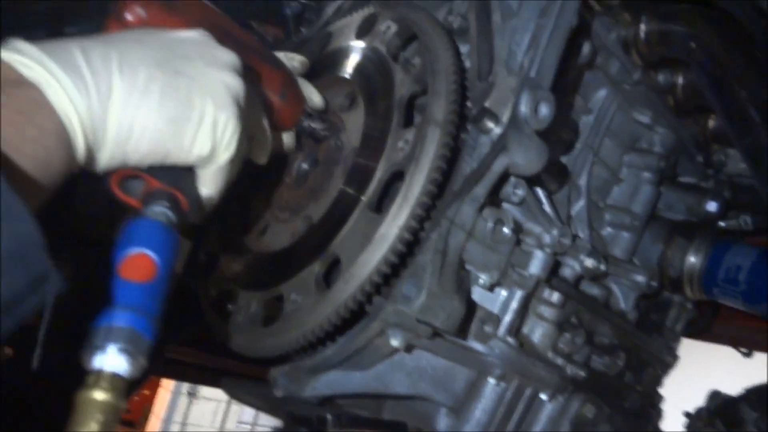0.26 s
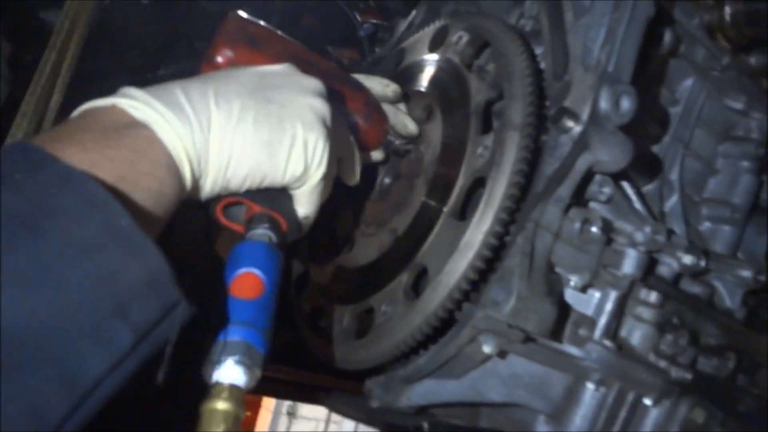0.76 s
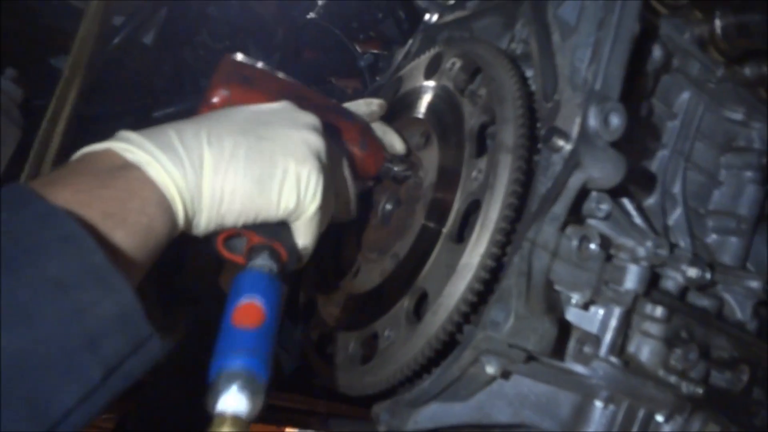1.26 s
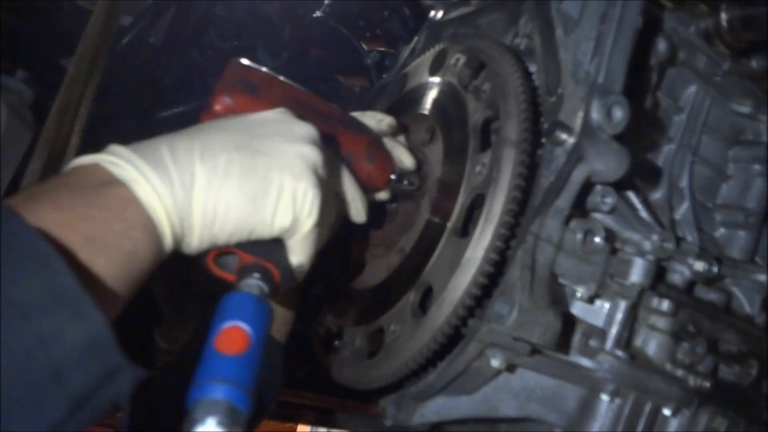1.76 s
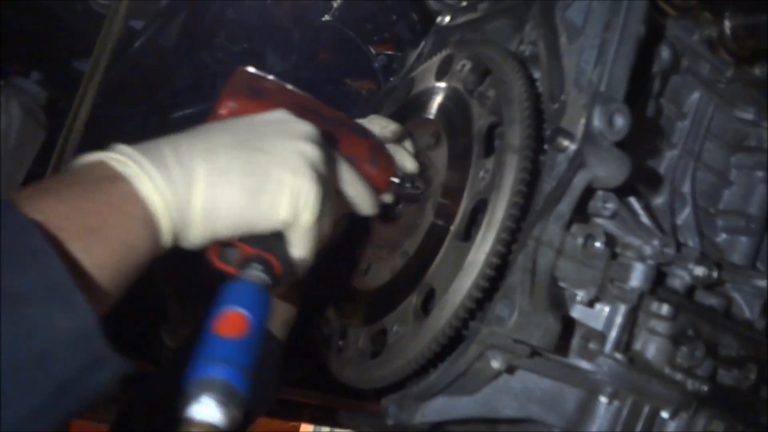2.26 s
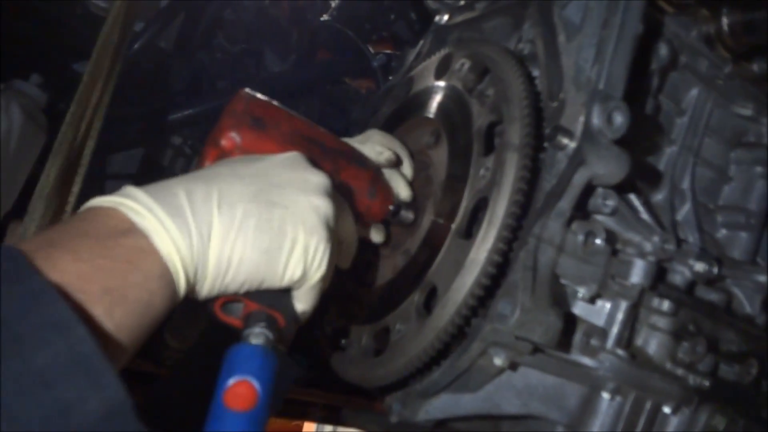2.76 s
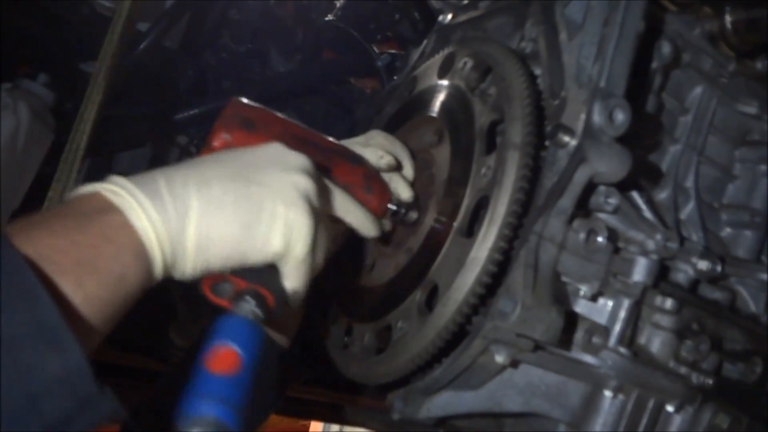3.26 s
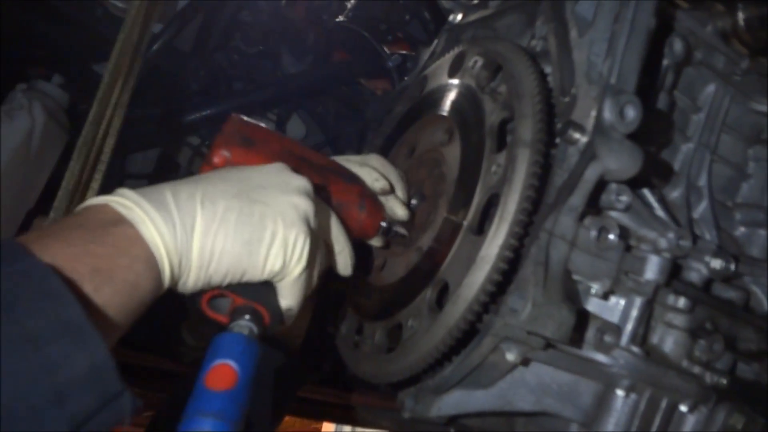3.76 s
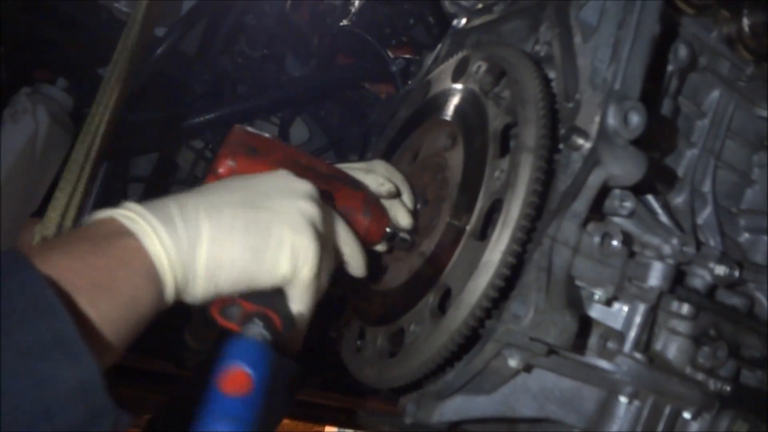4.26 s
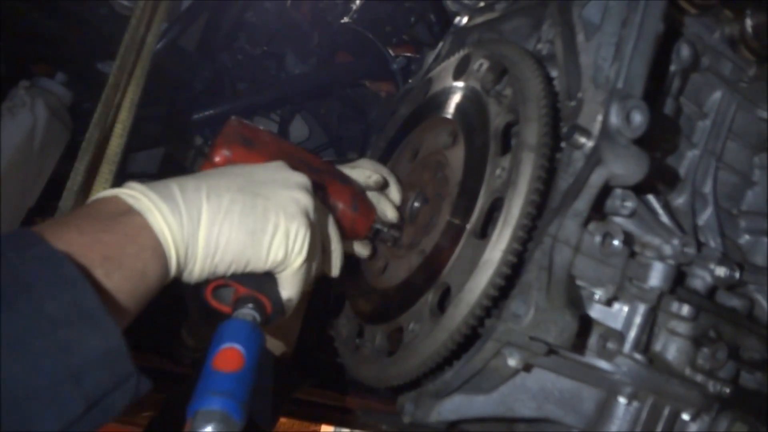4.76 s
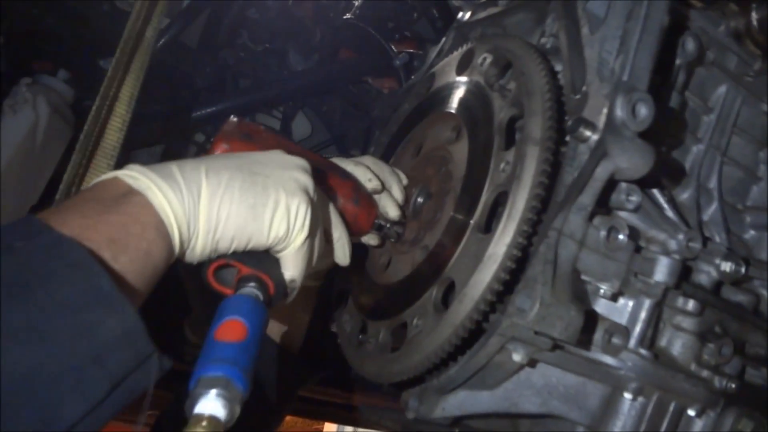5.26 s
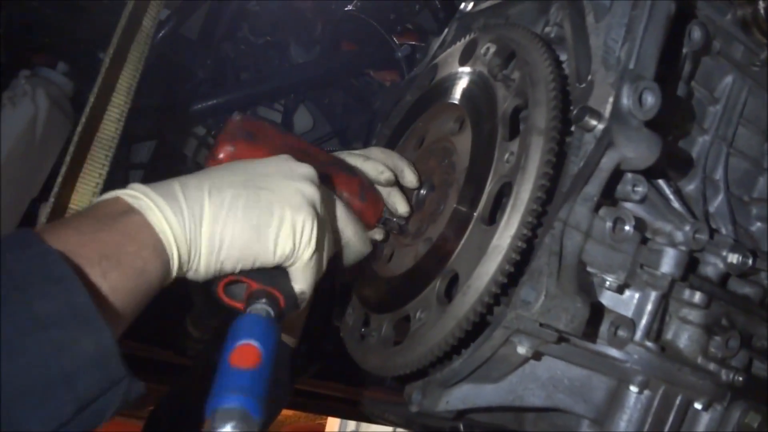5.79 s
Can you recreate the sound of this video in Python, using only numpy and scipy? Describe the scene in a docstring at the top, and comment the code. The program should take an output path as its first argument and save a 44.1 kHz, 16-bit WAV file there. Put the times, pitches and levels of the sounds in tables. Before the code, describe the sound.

A light metal clink opens over a faint garage hum. Near 0.8 seconds a socket clicks onto a bolt, followed by a faint, thin hiss of leaking air. At 1.1 seconds a close air impact wrench fires its loudest burst, a bright, fluttering blast of exhaust over a chugging motor, lasting about a fifth of a second. Similar short bursts come at 2.0, 3.0, 4.0 and 5.6 seconds. Each ends with a small knock as the tool coasts and leaves the steel flywheel ringing briefly, most clearly at about 4.2 seconds. In the pauses the socket clicks and clinks off one bolt and onto the next, around 1.7, 2.5, 2.8, 3.5, 3.8 and 5.4 seconds, often stirring a soft ring. The last burst ends with a sharp metallic knock near 5.8 seconds. The room adds a short echo, and the background slowly sinks.

```python
"""Five short, hissing bursts of an air impact tool on the bolts of a steel flywheel in a garage.
Each hammer cycle is a blast of exhaust air over the chug of a vane motor; the last blow of a burst
leaves the flywheel ringing. Between bursts the socket clicks off one bolt and onto the next.
Underneath sit a short room echo, one brief air leak and a faint, humming shop background."""
import sys
import numpy as np
from scipy import signal
from scipy.fft import rfft, irfft, next_fast_len
from scipy.io import wavfile
from scipy.ndimage import uniform_filter1d

SR = 44100
rng = np.random.default_rng(int(sys.argv[2]) if len(sys.argv) > 2 else 0)


def waveform_to_disk(signal):
    """Save audio, clipped to [-1, 1], as 16-bit WAV at the path in sys.argv[1]."""
    frames = np.transpose(np.atleast_2d(signal))
    scaled = np.clip(frames, -1, 1) * 32767
    samples = np.round(scaled).astype(np.int16)
    wavfile.write(sys.argv[1], SR, samples)


N = 265954
TIME = np.arange(N) / SR

# Hammer cycles, one list per burst. Each row: air on in seconds, hiss level in dB.
HAMMER_CYCLES = [
    [(1.118, -12), (1.131, 7), (1.172, 11), (1.21, 7.5), (1.254, 2.5)],
    [(2.008, -21.5), (2.017, -13), (2.029, -8.5), (2.058, -9), (2.098, -2.4), (2.139, 0.5)],
    [(3.02, -16), (3.035, -3.5), (3.075, -8.5), (3.116, -6.5), (3.158, -7)],
    [(4.032, -11), (4.051, -7.5), (4.087, -4.5), (4.112, -9), (4.157, -12)],
    [(5.62, -12.5), (5.631, -7.5), (5.66, -9), (5.7, -10.5), (5.736, -10.5), (5.776, -12)],
]
# Exhaust colour, one list per bolt as the tool is turned. Each row: frequency in Hz, relative dB.
EXHAUST_COLOURS = [
    [(880, -41), (1500, -6.5), (1780, -31), (2270, -19.5), (2490, -8), (2690, -11), (3590, -7.5),
     (4550, 2.5), (6430, -5.5), (7030, -2.5), (8000, -6.5), (9370, 0), (13500, 1), (15200, 2.5),
     (16000, -13)],
    [(880, -50.5), (1500, -5.5), (1830, -22), (2100, -14.5), (2340, -24.5), (2540, -14), (2800, -14),
     (3730, -12), (5170, -2), (6500, -9.5), (7610, -6), (10000, -12), (11700, 3), (14600, -9),
     (16000, -9.5)],
    [(880, -76), (1500, -5.5), (1740, -18.5), (2880, -16.5), (3220, -7.5), (4080, -12.5), (5020, -1),
     (6310, -10), (7460, -5.5), (8660, -7.5), (9280, -0.5), (10100, 1.5), (11200, -5), (14600, -1),
     (16000, -7.5)],
    [(880, -33), (1500, -16.5), (2000, -11), (2250, -21), (2560, -12.5), (3770, -13.5), (5540, -1),
     (6310, -16), (7100, -5.5), (8000, -13), (9010, -3), (11800, 1), (12600, -5.5), (15100, -6.5),
     (16000, -25.5)],
    [(880, -33), (1500, -12.5), (1810, -27), (1980, -12), (2210, -32), (2590, -17), (3730, -12),
     (5120, -3.5), (6000, -12), (7390, -4), (9010, -15), (11100, 2), (12200, -10.5), (13700, -4.5),
     (16000, -21)],
]
# The throaty body of the motor. Each row: frequency in Hz, relative dB.
CHUG_COLOUR = [(15, -75), (25, -46), (80, -43), (189, -32.5), (325, -14.5), (418, -4), (498, -2),
               (605, -12), (680, -2.5), (893, -2.5), (984, -1), (1320, -8), (1760, -12.5), (1980, -10.5),
               (2270, -14.5), (2600, -13), (3380, -40), (5720, -120)]
# Motor against hiss. Each entry: one burst's balance in dB.
MOTOR_DB = [-9.5, -11, -9.5, -10, -10.5]
# Stereo spread of tool, taps and leak. Each row: frequency in Hz, side against mid in dB.
TOOL_WIDTH = [(60, -19.5), (130, -15), (290, -8.5), (640, -6.5), (1410, -3), (3100, -7), (6820, -11),
              (15000, -21)]
VANES_PER_S, TURNS_PER_S = 350, 100
STALL_S, SPIN_UP_STALL_S = 0.0088, 0.0046   # the air dips before each next cycle; less after the first
SPIN_UP_CHUG_DB = -6   # the motor is weaker in the first cycle

# The last blow of each burst. Each row: trigger release in seconds, ring level in dB,
# brightness in dB per octave, place round the wheel in degrees.
LAST_BLOWS = [(1.284, -8, 1.46, 47), (2.165, -19.5, 3.5, 148), (3.185, -19, 3.4, 75.7),
              (4.187, 2, -5.5, 112.3), (5.794, -18.5, -2.5, 276)]
# Soft touches that stop the wheel and set its low modes going afresh. Each row: start in seconds,
# ring level in dB, brightness in dB per octave, place round the wheel in degrees.
WHEEL_TOUCHES = [(0.0, -27, -9.5, 256), (0.095, -35.5, -5.5, 332), (0.802, -22, -10.5, 354),
                 (1.722, -19, -12, 320), (1.759, -20, -8, 320), (2.525, -19.5, -7, 32.8),
                 (2.789, -29.0, -1.5, 44), (3.543, -23, -7, 112), (3.839, -39.4, -3.5, 35),
                 (4.603, -30.5, -8.2, 45), (5.388, -54, 6, 44)]
# The flywheel's partials. Each entry: one mode's pitch in Hz.
WHEEL_HZ = [1417, 1454, 2283, 3296, 3298.3, 3424, 4376, 4560, 6175, 6827, 7194, 7450, 8573, 8601, 10251,
            10426, 10460, 10611, 11066, 11083, 11900, 12063, 12777, 13464]
# Their patterns. Each entry: one mode's number of loud spots round the wheel.
WHEEL_LOBES = [4, 4, 6, 5, 5, 5, 5, 3, 1, 6, 4, 1, 4, 3, 1, 2, 3, 4, 4, 5, 2, 2, 2, 1]
# Their rings. Each row: relative dB, seconds to fade 60 dB, phase of the pattern in degrees.
WHEEL_MODES = [(-25.5, .82, 276), (-29.5, 1.9, 215), (-40.5, 3.9, 180), (-16.5, 0.66, 63), (-23, 0.6, 45),
               (-20, 0.41, 320), (-30, .77, 100), (-36.5, 0.63, 95), (-14, 0.27, 310), (-39.5, .5, 250),
               (-13, .3, 247), (-13, .34, 304), (-16.5, .36, 160), (-26, .36, 140), (-6, .34, 180),
               (-0.5, .2, 12), (-10.5, .23, 79), (-13, .25, 132), (-6.5, .27, 97), (-6.5, .27, 298),
               (-19.5, 0.32, 130), (-6, .23, 40), (-7.5, 0.23, 356), (-9.5, .17, 284)]
LOBE_DB, TOUCH_TOP_HZ = 12, 4000   # lift or cut at a loud or quiet spot; touches ring below this pitch

# Taps that leave the socket ringing.
# Each row: start in seconds, then click, thud and ring in relative dB.
RINGING_SOCKET_TAPS = [(.8, -26, -11.5, -63), (1.719, -28.5, -25.5, -60), (1.758, -49, -31.5, -75),
                       (2.525, -15.5, -29, -46.5), (3.541, -22, -34.5, -54)]
# Their bright snap, shared by the clinks. Each row: frequency in Hz, relative dB.
SNAP_COLOUR = [(120, -60), (400, -26.5), (1500, -12.5), (2500, 3.5), (5000, -4), (9000, -9.5), (12000, 1.5),
               (16000, 1.5)]
# The socket's ring. Each row: pitch in Hz, relative dB, seconds to fade 60 dB.
SOCKET_MODES = [(3400, -5, .15), (6175, -9, .2), (7300, 0.5, .2), (8380, -2, 0.21), (10426, 3.5, 0.19),
                (11070, -1.5, 0.29), (12900, -0.5, .14)]
# Clinks on a bolt head. Each row: start in seconds, then click, thud and ring in relative dB.
BOLT_CLINKS = [(.093, -17.5, -34, -47), (2.805, -42, -23.5, -48), (3.852, -34, -37, -41),
               (4.601, -40, -34.5, -48.5)]
# The short ring of a clink. Each row: pitch in Hz, relative dB, seconds to fade 60 dB.
CLINK_MODES = [(2420, -10, .12), (3310, -8, 0.11), (4676, -1, 0.2), (5150, -10, 0.099), (7500, -7, .07),
               (8450, -4, .06), (9900, -12, .12), (12000, -8.5, .05), (13600, -9.5, 0.0807)]
# The hammer knocks again as the rotor coasts.
# Each row: start in seconds, then click, thud and ring in relative dB.
COASTING_KNOCKS = [(1.322, -13, -4, -50.5), (2.239, -27.5, -12.5, -52), (3.253, -17, -16, -67),
                   (4.203, -22, -11.5, -27), (5.81, -7, -16.5, -25), (5.829, -15, -22.5, -48)]
# The crack of those knocks. Each row: frequency in Hz, relative dB.
KNOCK_COLOUR = [(150, -64), (500, -27.5), (1500, -11), (3000, -5), (6000, 1), (10000, -3), (16000, -18.5)]
# The socket lands held, with no ring. Each row: start in seconds, then click and thud in relative dB.
SOCKET_LANDINGS = [(.192, -40.5, -38), (.212, -48, -74), (.317, -48, -70), (.358, -52, -70),
                   (.492, -68, -42.5), (.773, -35, -27), (.781, -15.5, -21.5), (.79, -35, -15.5),
                   (1.09, -43.5, -64), (1.911, -57.5, -49), (2.685, -51.5, -66.5), (2.779, -40.5, -54),
                   (2.784, -20, -30), (3.829, -22, -37), (4.612, -59, -41.5), (4.678, -61, -47.5),
                   (4.982, -59, -67.5), (5.208, -56, -58), (5.379, -56, -54), (5.386, -19, -37),
                   (5.405, -54.5, -47), (5.42, -60, -49)]
# The tick of a landing. Each row: frequency in Hz, relative dB.
LANDING_COLOUR = [(120, -60.5), (400, -27.5), (1500, -11.5), (2500, -4), (5000, 1), (7500, -0.5), (9000, 6),
                  (11000, -8), (16000, -5)]

# The echo's decay as heard; its top treble dies almost at once.
# Each row: frequency in Hz, seconds to fade 60 dB.
ECHO_T60 = [(100, 0.14), (500, 0.34), (2000, 0.4), (5000, 0.4), (9000, 0.27), (12000, 0.27), (14000, .15),
            (16000, 0.07)]
# The echo's tone. Each row: frequency in Hz, relative dB.
ECHO_COLOUR = [(300, -4), (1500, 1), (3000, 4.5), (5000, -3.5), (8000, 2.5), (13000, -2.5)]
# The echo's spread. Each row: frequency in Hz, side against mid in dB.
ECHO_WIDTH = [(60, -27.5), (180, -23), (550, -40), (1650, -11), (4970, -12), (15000, -17)]
AIR_ECHO_DB, TAP_ECHO_DB, RING_ECHO_DB = -11.5, -25, -24   # reverb sends

# A brief puff of leaking air. Each row: time in seconds, level in dB.
LEAK_FADE = [(.85, -78), (.9, -60), (.94, -55.5), (.99, -65), (1.05, -80)]
# Its thin, whistling colour. Each row: frequency in Hz, relative dB.
LEAK_COLOUR = [(1760, -42), (3000, -28.5), (3360, -0.5), (3620, -22.5), (4110, -16), (5110, -5),
               (11400, -8), (12500, -1), (16000, -19.5)]
# The shop background slowly sinks. Each row: time in seconds, level in dB.
SHOP_FADE = [(0, -59), (1, -57), (2, -63), (3, -65.5), (4, -67), (5, -69.5), (6.03, -68.5)]
# Its dull colour. Each row: frequency in Hz, relative dB.
SHOP_COLOUR = [(12, -56.5), (20, -26.5), (53, -24.5), (123, -9), (262, -15.5), (607, -6.5), (759, -7),
               (825, -5.5), (949, -6.5), (1330, -11), (1440, -6.5), (1570, -14.5), (2140, -20),
               (13500, -27.5), (16000, -29.5)]
# Its spread. Each row: frequency in Hz, side against mid in dB.
SHOP_WIDTH = [(60, -15), (180, -7.5), (550, -6), (1650, -6.5), (4970, -3), (15000, -12.5)]
# Its hum. Each row: pitch in Hz, peak level in dB against the background noise.
SHOP_HUM = [(118.4, -17), (764.4, -7.5)]


def tool_burst(start, cycles, let_go, motor_db, colour):
    """Exhaust hiss fluttering with vanes and rotor turns, over the pulsing chug of the motor."""
    t = start + np.arange(int(.38 * SR)) / SR
    vanes = pulses(t, VANES_PER_S, jitter=.25, spread_db=3.5)
    turns = pulses(t, TURNS_PER_S, jitter=.17, spread_db=3.5)
    vane_puffs = signal.lfilter([1], [1, -.985], vanes)
    turn_puffs = signal.lfilter([1], [1, -.993], turns)
    flutter = 1 + .5 * vane_puffs + .54 * turn_puffs
    hiss = rms_one(flutter * coloured(rng.standard_normal((2, len(t))), colour, TOOL_WIDTH))
    noise = rng.standard_normal((2, len(t)))
    buzz_mid = vanes - uniform_filter1d(vanes, size=400)
    buzz_side = .5 * np.roll(vanes, 30) * np.sign(noise[1])
    chug = coloured(.14 * noise + [buzz_mid, buzz_side], CHUG_COLOUR, TOOL_WIDTH)
    on, hiss_db = np.transpose(cycles)
    first = on == on[0]
    off = np.append(on[1:], let_go + STALL_S) - np.where(first, SPIN_UP_STALL_S, STALL_S)
    spans = list(zip(on, off))
    chug_db = hiss_db + motor_db + SPIN_UP_CHUG_DB * first
    hiss_gate = air_gate(t, spans, hiss_db, gap_db=-4, lag=0, rise=.0013, fall=.002, coast=.028)
    chug_gate = air_gate(t, spans, chug_db, gap_db=-13, lag=.011, rise=.0042, fall=.01, coast=.11)
    return hiss * hiss_gate + chug * chug_gate


def pulses(t, per_s, jitter, spread_db):
    """The motor's beat: a pulse train, uneven in spacing and strength."""
    timing, strength = rng.standard_normal((150, 2)).T
    at = ((np.arange(len(timing)) + jitter * timing) * SR / per_s).astype(int)
    inside = (at >= 0) & (at < len(t))
    train = np.zeros(len(t))
    train[at[inside]] = from_db(spread_db * strength[inside])
    return train


def air_gate(t, spans, level_db, gap_db, lag, rise, fall, coast):
    """The level dips each time the hammer lands and stalls the rotor, then coasts out at the end."""
    points = [(spans[0][0] - .01, level_db[0] - 33.5)]
    for (on, off), db in zip(spans, level_db):
        points += [(on + lag - rise, db + gap_db), (on + lag, db), (off, db), (off + fall, db + gap_db)]
    run_down = [(off + fall, db - 7.5), (off + fall + coast, db - 50)]
    return fade(t, sorted(points[:-1] + run_down))


def flywheel():
    """The wheel rings until the next blow or touch; the place struck decides which modes stand out."""
    out = np.zeros((2, N))
    blows = [(*row, SR / 2) for row in LAST_BLOWS]
    touches = [(*row, TOUCH_TOP_HZ) for row in WHEEL_TOUCHES]
    strikes = sorted(blows + touches)
    stops = [row[0] for row in strikes[1:]] + [N / SR]
    for (start, db, tilt_db, place, top_hz), stop in zip(strikes, stops):
        for hz, lobes, (mode_db, t60, phase) in zip(WHEEL_HZ, WHEEL_LOBES, WHEEL_MODES):
            bright_db = tilt_db * np.log2(hz / WHEEL_HZ[0])
            place_db = LOBE_DB * np.cos(np.radians(lobes * place - phase))
            level_db = db + mode_db + bright_db + place_db
            if hz < top_hz:
                add(out, start, ringing_mode(hz, level_db, t60, until=stop - start, swell=.017))
    return out


def ringing_mode(hz, level_db, t60, until=3.0, swell=.0049):
    """One dying partial of steel, damped at `until` seconds; the side is weaker and shifted in phase."""
    t = np.arange(int(min(1.2 * t60, until + .0072) * SR)) / SR
    phase, lag = rng.uniform(0, 2 * np.pi, 2)
    decay = from_db(level_db - 60 * t / t60)
    gate = np.clip(np.minimum(t / swell, (until + .0059 - t) / .012), 0, 1)
    return decay * gate * np.sin(2 * np.pi * hz * t + [[phase], [phase + lag]]) * [[1], [.25]]


def metal_taps():
    """Each socket or hammer contact is a noise click and a thud; all but the held landings also ring."""
    out = np.zeros((2, N))
    t = np.arange(SR // 12) / SR
    snap = from_db(-60 * t / .012) + .24 * from_db(-60 * t / .081)
    kinds = [(RINGING_SOCKET_TAPS, SNAP_COLOUR, SOCKET_MODES), (BOLT_CLINKS, SNAP_COLOUR, CLINK_MODES),
             (COASTING_KNOCKS, KNOCK_COLOUR, CLINK_MODES), (SOCKET_LANDINGS, LANDING_COLOUR, [])]
    for hits, colour, modes in kinds:
        for start, click_db, thud_db, *ring_db in hits:
            click = .5 * snap * coloured(rng.standard_normal((2, len(t))), colour, TOOL_WIDTH)
            add(out, start, from_db(click_db) * click + from_db(thud_db) * body_thud(t))
            for hz, mode_db, t60 in modes:
                add(out, start, ringing_mode(hz, ring_db[0] + mode_db + rng.normal(0, 3), t60))
    return out


def body_thud(t):
    """A knock stirs four broad, dull resonances of the tool body."""
    knock = rng.standard_normal((2, len(t))) * from_db(-60 * t / .05) * [[1], [.4]]
    body = (2.1 * resonate(knock, 1280, 270) + .5 * resonate(knock, 620, 250)
            + .29 * resonate(knock, 2000, 1000) + .62 * resonate(knock, 3100, 530))
    thud = signal.sosfilt(signal.butter(2, 400, "high", fs=SR, output="sos"), body)
    return thud / np.abs(thud).max()


def echo(send):
    """A short tail of third-octave noise bands, each dying at its own rate."""
    t = np.arange(SR) / SR
    white = rng.standard_normal((2, 2, len(t)))
    tail = np.zeros((2, len(t)))
    for k, hz in enumerate(60 * 2 ** np.arange(0, 8.2, 1 / 3)):
        bandpass = signal.butter(2, [hz / 1.12, hz * 1.12], "band", fs=SR, output="sos")
        decay = from_db(at_hz(ECHO_COLOUR, hz) - 60 * t / at_hz(ECHO_T60, hz))
        spread = from_db([[0], [at_hz(ECHO_WIDTH, hz)]])
        tail += signal.sosfilt(bandpass, white[k % 2]) * decay * spread
    tail *= np.clip(t / .013, 0, 1)
    tail /= np.sqrt(np.sum(tail[0] ** 2))
    return signal.fftconvolve(send[None], tail, axes=1)[:, :N]


def air_leak():
    """Escaping air gives one short, thin hiss."""
    return coloured(rng.standard_normal((2, N)), LEAK_COLOUR, TOOL_WIDTH) * fade(TIME, LEAK_FADE)


def shop_background():
    """Dull room tone with two faint hum lines in the centre, sinking together."""
    bed = coloured(rng.standard_normal((2, N)), SHOP_COLOUR, SHOP_WIDTH)
    bed[0] += sum(from_db(db) * np.sin(2 * np.pi * hz * TIME) for hz, db in SHOP_HUM)
    return bed * from_db(np.interp(TIME, *np.transpose(SHOP_FADE)))


def from_db(db):
    """Decibels to gain."""
    return 10 ** (np.asarray(db) / 20)


def fade(t, points):
    """A fader ride through (seconds, dB) points, silent outside them."""
    return from_db(np.interp(t, *np.transpose(points), left=-140, right=-140))


def rms_one(x):
    """Scales mid and side together so the mid has rms 1."""
    return x / np.sqrt(np.mean(x[0] ** 2) + 1e-20)


def at_hz(points, hz):
    """Reads a (Hz, value) table on a log frequency axis."""
    freqs, values = np.transpose(points)
    return np.interp(np.log(np.maximum(hz, 1)), np.log(np.maximum(freqs, 1)), values)


def coloured(x, colour, width):
    """Equalises mid and side and normalises them; the width table turns the side down."""
    size = next_fast_len(x.shape[1])
    hz = np.arange(size // 2 + 1) * SR / size
    mid_db = at_hz(colour, hz)
    gain = from_db([mid_db, mid_db + at_hz(width, hz)])
    return rms_one(irfft(rfft(x, size) * gain, size)[:, :x.shape[1]])


def resonate(x, hz, width_hz):
    """Two-pole resonance, gain 1 at its peak."""
    r = np.exp(-np.pi * width_hz / SR)
    gain = (1 - r * r) / 2
    return signal.lfilter([gain, 0, -gain], [1, -2 * r * np.cos(2 * np.pi * hz / SR), r * r], x + 1e-18)


def add(out, start, sound):
    """Mixes a sound in at `start` seconds."""
    i = round(start * SR)
    out[:, i:i + sound.shape[1]] += sound[:, :N - i]


def scene():
    """Tool, flywheel and taps in the garage; mid and side become left and right."""
    taps, ring = metal_taps(), flywheel()
    air = np.zeros((2, N))
    bursts = zip(HAMMER_CYCLES, EXHAUST_COLOURS, LAST_BLOWS, MOTOR_DB)
    for cycles, colour, (let_go, *_), motor_db in bursts:
        start = cycles[0][0] - .02
        add(air, start, tool_burst(start, cycles, let_go, motor_db, colour))
    send = from_db(AIR_ECHO_DB) * air + from_db(TAP_ECHO_DB) * taps + from_db(RING_ECHO_DB) * ring
    mid, side = air + taps + ring + echo(send[0]) + shop_background() + air_leak()
    return np.array([mid + side, mid - side])


def record(dry):
    """A limiter ducks the bursts and lets go slowly; peaks are rounded, deep bass and top are cut."""
    threshold_db, release_db_per_s = -8, 110
    level_db = 10 * np.log10(uniform_filter1d(np.mean(dry ** 2, axis=0), size=400) + 1e-12)
    over_db = np.maximum(level_db - threshold_db, 0)
    release = release_db_per_s * TIME
    duck_db = np.maximum.accumulate(over_db + release) - release
    ducked = dry * from_db(-uniform_filter1d(duck_db, size=300))
    rounded = .86 * ducked / (1 + ducked ** 6) ** (1 / 6)
    low_cut = signal.butter(2, 60, "high", fs=SR, output="sos")
    high_cut = signal.cheby2(14, 70, 16700, fs=SR, output="sos")
    return signal.sosfilt(high_cut, signal.sosfilt(low_cut, rounded))


dry = scene()
out = record(dry)
waveform_to_disk(out)
```